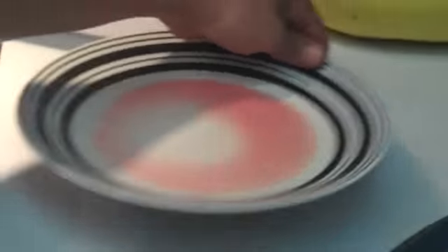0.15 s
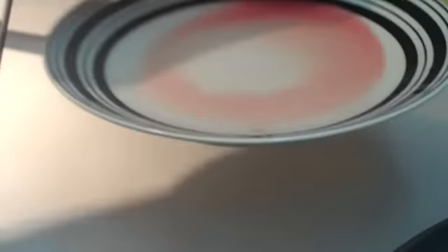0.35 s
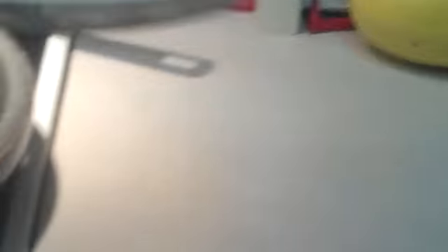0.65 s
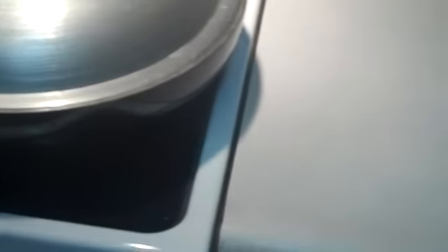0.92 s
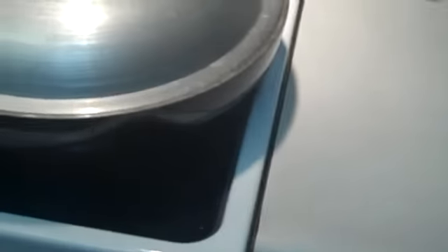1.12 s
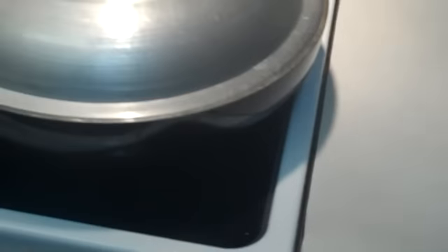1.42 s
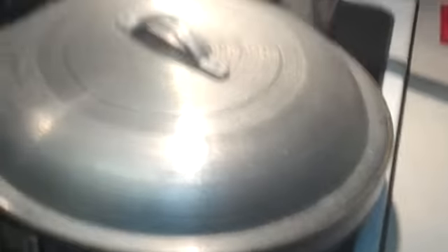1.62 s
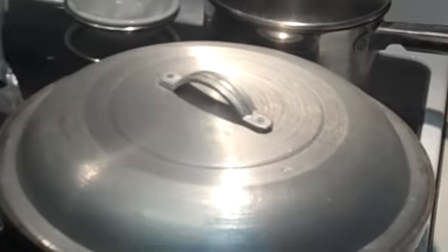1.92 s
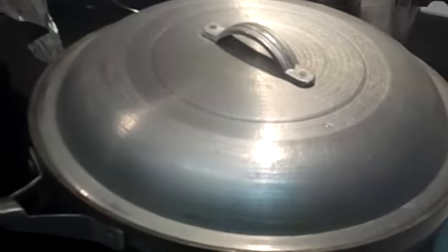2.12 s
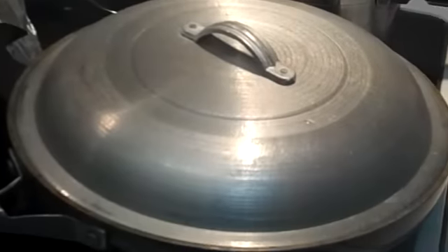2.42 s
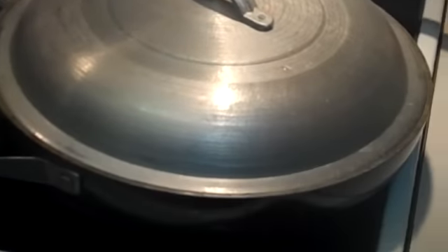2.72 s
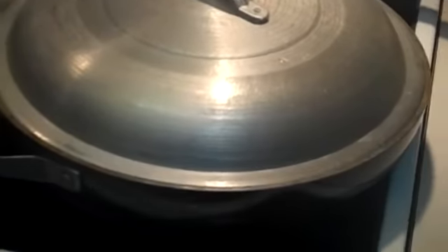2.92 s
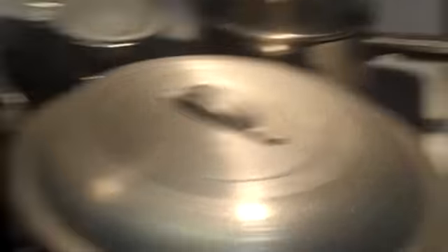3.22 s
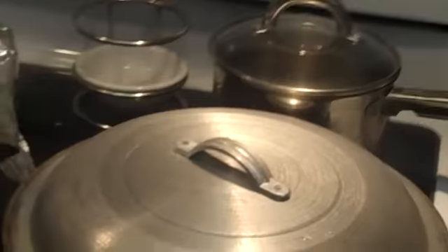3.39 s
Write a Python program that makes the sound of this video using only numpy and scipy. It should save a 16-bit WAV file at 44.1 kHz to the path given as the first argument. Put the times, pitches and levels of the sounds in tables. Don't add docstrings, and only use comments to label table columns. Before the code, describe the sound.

Continuous frying fizz and crackle from a covered pan on a kitchen stove, a few soft knocks, and a short metal clatter before the sizzling continues alone; low room hum, slight handling rumble, muffled phone microphone.

```python
import sys
import numpy as np
from scipy import signal
from scipy.fft import rfft, irfft
from scipy.io import wavfile
from scipy.ndimage import uniform_filter1d

SR = 44100
rng = np.random.default_rng(int(sys.argv[2]) if len(sys.argv) > 2 else 0)


def transcribe(signal):
    frames = np.atleast_2d(signal).T
    limited = np.clip(frames, -1, 1)
    pcm = np.round(limited * 32767).astype(np.int16)
    wavfile.write(sys.argv[1], SR, pcm)


def decibels_to_gain(level_db):
    exponent = np.asarray(level_db, float) / 20
    return 10 ** exponent


N = 156555
WIDE_TOP_HZ = 6400


def colour(x, table):
    hz, db = np.array(table, float).T
    f = np.maximum(np.fft.rfftfreq(len(x), 1 / SR), 1)
    gain_db = np.interp(np.log(f), np.log(hz), db)
    y = irfft(rfft(x) * decibels_to_gain(gain_db), len(x))
    return y / y.std()


def ring(x, hz, width_hz):
    return signal.lfilter(*signal.iirpeak(hz, hz / width_hz, SR), x)


def walk(rate_hz):
    k = int(SR / rate_hz)
    steps = np.repeat(rng.standard_normal(N // k + 1), k)
    return 1.3 * uniform_filter1d(uniform_filter1d(steps, k), k)[:N]


def add(out, start_s, sound):
    i = max(int(start_s * SR), 0)
    out[i:i + len(sound)] += sound[:N - i]


def fizz():
    # time_s, level_db
    vigour = [(0, -38), (.1, -40.5), (.3, -39), (.52, -41), (.6, -38.5), (.8, -39), (.9, -41.5),
              (1.1, -38.5), (1.3, -38.5), (1.5, -38.5), (1.6, -39.5), (1.72, -35.5), (1.85, -39),
              (2.3, -39.5), (2.55, -38.5), (2.85, -40), (3.2, -39.5), (3.55, -37)]
    # hz, density_db
    spectrum = [(300, -47.5), (600, -12.5), (900, -7), (1390, -11), (2040, -7), (3600, -5.5), (5200, -1.5),
                (6400, -6.5), (8300, -42)]
    # mode_hz, width_hz, level_db
    lid_modes = [(956, 340, -6.5), (1209, 130, -14), (2120, 130, -5), (2350, 92, -10.5), (3480, 92, -18),
                 (4404, 50, -2.5), (5216, 230, 5), (5950, 180, 0)]
    bubbles_per_s, bubble_spread_db = 7000, 1.2
    lid_db, surge_db, flicker_db = -9, 1.4, 2.4

    t = np.arange(N) / SR
    u = rng.random((2, N))
    sizes = decibels_to_gain(-bubble_spread_db * np.log(u[1] + 0.005))
    clicks = (u[0] < bubbles_per_s / SR) * sizes * rng.standard_normal(N)
    broad = colour(clicks + 0.18 * rng.standard_normal(N), spectrum)
    lid = sum(decibels_to_gain(db) * ring(clicks, hz, width_hz) for hz, width_hz, db in lid_modes)
    mix = broad + decibels_to_gain(lid_db) * lid / lid.std()

    surge = walk(14)
    out = np.zeros(N)
    for hz in 350 * 2 ** np.arange(0, 4.4, .5):
        out += ring(mix, hz, 0.41 * hz) * decibels_to_gain(surge_db * surge + flicker_db * walk(24))
    return out / out.std() * decibels_to_gain(np.interp(t, *np.array(vigour).T))


def bursts(table, width, crack_db, crack_s, rise_s):
    out = np.zeros(N)
    t = np.arange(SR // 4) / SR
    noise = rng.standard_normal((len(table), 2, len(t)))
    for (start_s, peak_db, hz, t60_s), (puff, snap) in zip(table, noise):
        first_half_cycle = t < 1 / hz / 2
        body = ring(puff + 3 * first_half_cycle, hz, width * hz)
        crack = ring(snap + 1.5 * first_half_cycle, 1.25 * hz, .8 * hz)
        crack = ring(crack, 1.25 * hz, .8 * hz)
        crack = decibels_to_gain(crack_db) * crack / crack.std() * np.exp(-t / crack_s)
        envelope = (1 - np.exp(-t / rise_s)) * 1000 ** (-t / t60_s)
        sound = (body / body.std() + crack) * envelope
        add(out, start_s, decibels_to_gain(peak_db) * sound / np.abs(sound).max())
    return out


def pops():
    # start_s, peak_db, cavity_hz, t60_s
    strong = [(0.0159, -34, 3130, 0.053), (0.0318, -29.5, 2985, 0.14), (0.0862, -22, 2130, 0.097),
              (0.1516, -32, 3390, 0.073), (0.6519, -29.5, 1840, 0.061), (0.7886, -29.5, 1975, 0.08),
              (0.9827, -32, 2064, 0.089), (1.4576, -24, 2590, 0.062), (1.494, -25, 1964, 0.085),
              (1.6215, -21, 2550, 0.19), (1.6931, -27.5, 2870, 0.11), (1.7509, -30, 2070, 0.083),
              (1.9644, -24.5, 1873, 0.06), (2.1365, -20.5, 2060, 0.077), (2.1675, -28, 2970, 0.072),
              (2.388, -22.5, 2150, 0.045), (2.5067, -23.5, 2120, 0.057), (2.5805, -29, 2190, 0.052),
              (2.7531, -21.5, 2120, 0.16), (2.9535, -21.5, 2120, 0.085), (3.0669, -30, 2900, 0.13),
              (3.0874, -25, 2740, 0.089), (3.1283, -25, 3250, 0.093), (3.1557, -22.5, 1860, 0.2)]
    # start_s, peak_db, cavity_hz, t60_s
    weak = [(0.58, -30, 2350, 0.2), (1.4735, -28, 2500, 0.053), (1.6402, -24, 1890, 0.11),
            (3.483, -28, 2170, 0.13), (3.5333, -30, 2990, 0.091), (0.2125, -32, 3840, 0.042),
            (0.5408, -35, 2820, 0.12), (1.05, -32, 1810, 0.088), (1.2301, -31.5, 3310, 0.16),
            (1.3448, -34, 3175, 0.11), (1.4361, -32.5, 3200, 0.069), (1.496, -25.5, 2710, 0.055),
            (1.77, -29.5, 2880, 0.051), (2.389, -25, 2786, 0.051), (2.4344, -31, 3280, 0.079),
            (2.517, -27, 3730, .08), (2.6058, -32.5, 2920, 0.08), (2.7002, -34.5, 2090, .08),
            (2.76, -30, 4160, 0.067), (3.089, -32.5, 3940, 0.033), (3.547, -24, 2330, .1)]
    return bursts(strong + weak, .14, 2.2, 0.006, 0.0005)


def spits():
    # start_s, peak_db, cavity_hz, t60_s
    droplets = [(.0987, -25, 5040, 0.077), (0.165, -25.5, 4900, 0.05), (0.2428, -33, 5360, 0.14),
                (0.7582, -25.5, 5200, 0.036), (.8001, -33, 5440, 0.076), (.819, -32, 4500, .02),
                (1.0859, -29.5, 5400, 0.057), (1.3887, -34, 5300, 0.037), (1.5763, -33.5, 4600, 0.055),
                (1.6385, -30.5, 5300, 0.062), (1.7005, -26, 5200, 0.1), (1.8731, -31, 5730, 0.045),
                (2.0614, -33, 5170, 0.035), (2.141, -28, 5300, 0.074), (2.3252, -35, 5170, 0.05),
                (2.3835, -25.5, 5140, 0.062), (2.5377, -22.5, 4850, 0.056), (2.7506, -24.5, 4900, 0.1),
                (2.8535, -23, 5370, 0.025), (2.8953, -28.5, 5170, .04), (3.0031, -25, 5290, .04)]
    return bursts(droplets, 0.27, 2.0, 0.0044, 0.00054)


def knocks():
    # start_s, peak_db, body_hz, t60_s
    hits = [
        (0.037, -31, 678, 0.28),
        (0.064, -29.5, 721, 0.34),
        (0.554, -26.5, 900, 0.15),
        (0.821, -33, 802, 0.14),
        (1.317, -42, 827, 0.36),
        (1.696, -28.5, 802, 0.2),
        (1.759, -37.5, 880, 0.25),
        (3.067, -36.5, 886, 0.27),
    ]
    thumps = [(start_s, db - 7.5, 220, t60_s) for start_s, db, hz, t60_s in hits]
    return bursts(hits, .4, -1.7, 0.011, .002) + bursts(thumps, 0.45, -5, 0.025, 0.0034)


def clatter():
    # start_s, peak_db, contact_s, brightness_db
    blows = [(3.224, -28, 0.0018, 6.5), (3.239, -12, 0.0019, 0.5), (3.244, -8.5, 0.0023, 0.5),
             (3.2505, -17, 0.0028, 5), (3.272, -19, .002, -1.5), (3.284, -22.5, .002, -3),
             (3.296, -12, 0.0015, 2), (3.309, -14.5, 0.002, -2), (3.327, -17, 0.0027, -6),
             (3.346, -20.5, .003, 1), (3.368, -23, 0.0027, -3), (3.392, -24.5, .003, -2)]
    # mode_hz, level_db, t60_s
    low_modes = [(269.4, -2, 0.3), (398.6, 0, 0.14), (440, -6, 0.23), (462.5, -5.5, 0.27),
                 (502.6, -5.5, 0.2), (547, -10.5, 0.14), (688, -2.5, 0.45), (730, -10, 0.18),
                 (817, -14, 0.35), (940, -14, 0.3), (1120, -7.5, 0.41), (1479, -14.5, 0.3),
                 (1533, -12.5, 0.34), (1665, -13, 0.33)]
    # mode_hz, level_db, t60_s
    top_modes = [(1753, -12.5, .2), (2116, -17, .2), (2236, -14.5, 0.63), (2426, -7.5, 0.14),
                 (2687, -12, 0.33), (2914, -14.5, .2), (3023, -12, 0.41), (3447, -15, .3),
                 (4060, -14, 0.23), (4510, -16, 0.13), (4834, -11, .15), (5350, -19, .1),
                 (5870, -19, 0.068)]
    # centre_hz, width_hz, level_db
    rattle_bands = [(514, 150, -4), (1150, 350, -2), (1628, 320, -1), (2208, 240, -3.5), (2850, 500, 0),
                    (3545, 370, -5), (4550, 400, -3), (5300, 900, -2)]
    rattle_db, rattle_t60_s, thud_db = .5, 0.15, -4
    wobble_rad, damped_at_s, damping_s = .45, 3.425, 0.0047

    out = np.zeros(N)
    t = np.arange(SR // 2) / SR
    pan = low_modes + top_modes
    chance = rng.standard_normal((len(blows), len(pan), 3))
    wobble = walk(90)
    for (start_s, peak_db, contact_s, bright_db), rows in zip(blows, chance):
        modes = np.zeros(len(t))
        for (hz, db, t60_s), (level, detune, turn) in zip(pan, rows):
            gain = decibels_to_gain(db + 2.1 * level + bright_db * np.log2(hz / 700) / 2)
            rocking = wobble_rad * np.roll(wobble, int(40 * hz))[:len(t)]
            phase = 2 * np.pi * hz * (1 + 0.0017 * detune) * t + 2 * turn + rocking
            modes += gain * np.sin(phase) * 1000 ** (-t / t60_s) / 4
        noise = rng.standard_normal(len(t))
        rattle = np.zeros(len(t))
        for hz, width_hz, db in rattle_bands:
            gain = decibels_to_gain(db + bright_db * np.log2(hz / 700) / 2)
            rattle += gain * ring(ring(noise, hz, width_hz), hz, width_hz) * np.sqrt(300 / width_hz)
        thud = ring(noise, 330, 250)
        loose = decibels_to_gain(rattle_db) * rattle * 5 + decibels_to_gain(thud_db) * thud / thud.std()
        loose *= 1000 ** (-t / rattle_t60_s) / 3
        add(out, start_s, decibels_to_gain(peak_db) * (modes + loose) * (1 - np.exp(-t / contact_s)))
    late = (np.arange(N) / SR - damped_at_s) / damping_s
    return out / (1 + np.exp(np.clip(late, -50, 50)))


def handling():
    # start_s, length_s, level_db
    shifts = [
        (0.165, 0.33, -61),
        (0.614, 0.1, -63),
        (0.744, 0.035, -62.5),
        (0.916, 0.056, -64),
        (1.011, 0.022, -54),
        (1.07, 0.14, -62),
        (1.326, 0.049, -64),
        (2.814, 0.045, -67),
        (3.247, 0.16, -60),
    ]
    out = np.zeros(N)
    spectrum = [(10, -9.5), (30, -1.5), (50, 5), (70, 0.5), (110, -41), (20000, -101.0)]  # hz, density_db
    rumble = colour(rng.standard_normal(N), spectrum)
    rumble /= np.sqrt(uniform_filter1d(rumble ** 2, SR // 25))
    for start_s, length_s, db in shifts:
        patch = signal.windows.tukey(int(length_s * SR), min(0.025 / length_s, 1))
        add(out, start_s, decibels_to_gain(db) * patch)
    return out * rumble


def kitchen():
    # hz, density_db
    spectrum = [(30, -21.5), (90, -28.5), (150, -10), (210, -2), (320, -18), (425, -5), (530, -19.5),
                (700, -11), (1000, -40)]
    level_db, early_db, early_s = -57.5, 4.5, 0.49
    t = np.arange(N) / SR
    drift_db = early_db * np.exp(-t / early_s) + 3.6 * walk(15)
    return colour(rng.standard_normal(N), spectrum) * decibels_to_gain(level_db + drift_db)


def scene():
    oil = fizz() + pops() + spits()
    low_cut = signal.butter(4, 170, "high", fs=SR, output="sos")
    events = signal.sosfilt(low_cut, knocks() + clatter())
    return (oil + events + kitchen())[None]


def thin_spectrum(x):
    frame, frame_start = 941, 497
    top_hz, wide_share = 6000, .25
    step_db, step_scatter_db = 6, 3.5
    spread, dropout_sigma = .8, .95

    n = np.arange(2 * frame)
    k = np.arange(int(2 * WIDE_TOP_HZ * frame / SR))
    window = np.sin(np.pi * (n + .5) / (2 * frame))
    basis = window[:, None] * np.cos(np.pi / frame * np.outer(n + .5 + frame / 2, k + .5))
    lead = 2 * frame - frame_start
    x = np.pad(x, (lead, 3 * frame))
    c = np.lib.stride_tricks.sliding_window_view(x, 2 * frame)[::frame] @ basis

    widths = np.clip(1.09 ** np.arange(60), 4, 12)
    edges = np.unique((np.cumsum(widths) // 4 * 4).astype(int))
    band = np.searchsorted(edges, k, side="right")
    power = np.array([np.mean(c[:, band == b] ** 2, axis=1) for b in range(band.max() + 1)]).T
    mask = power ** (1 - spread) * uniform_filter1d(power, size=5, axis=1) ** spread

    def scatter():
        return np.sqrt(2) * uniform_filter1d(rng.standard_normal(power.shape), size=2, axis=0)

    step = np.sqrt(mask) * decibels_to_gain(step_db + step_scatter_db * scatter())
    step = step[:, band] + 1e-9
    q = np.sign(c) * np.floor(np.abs(c / step) ** .75 + .4054) ** (4 / 3) * step

    weakness = np.log(mask / power)
    boost = np.log(power / np.median(power, axis=0)).clip(0)
    starved = scatter() + weakness - .6 * boost > dropout_sigma
    q *= ~starved[:, band]
    q *= (k < 2 * top_hz * frame / SR) | (rng.random((len(c), 1)) < wide_share)

    frames = q @ basis.T * 2 / frame
    y = np.zeros(len(x))
    for i, piece in enumerate(frames):
        y[i * frame:(i + 2) * frame] += piece
    return y[lead:lead + N]


def residue(x):
    # hz, density_db
    spectrum = [(100, -7.5), (6000, 4), (8000, -2.5), (8600, -17.5), (9000, -42)]
    level_db, flicker_db = -31, 1.7
    treble = ring(x, 3900, 4000)
    follow = np.sqrt(uniform_filter1d(treble ** 2 + 0.12 * x ** 2, SR // 90) + 1e-10) ** 0.66
    hiss = colour(rng.standard_normal(N), spectrum)
    dips_db = 7.6 * np.clip(walk(30) - 1.1, 0, 1)
    return hiss * follow * decibels_to_gain(level_db + flicker_db * walk(60) - dips_db)


def squeak():
    start_s, length_s, level_db, ramp_s = 0.174, 0.027, -50, 0.0031
    from_middle_s = abs(np.arange(N) / SR - start_s - length_s / 2)
    gate = np.clip((length_s / 2 - from_middle_s) / ramp_s, 0, 1)
    band = signal.butter(6, (6400, 7400), "band", fs=SR, output="sos")
    return signal.sosfilt(band, gate * decibels_to_gain(level_db) * 4 * rng.standard_normal(N))


def band_limit(x):
    return signal.sosfilt(signal.butter(12, 8820, fs=SR, output="sos"), x)


def record(dry):
    shaping, ceiling = .8, .55
    quick = uniform_filter1d(uniform_filter1d(dry[0] ** 2, size=200), size=200)
    quick = quick ** (shaping / 2) + 1e-9
    x = thin_spectrum(dry[0] / quick) * quick
    x = ceiling * np.tanh(x / ceiling)
    x = signal.sosfilt(signal.butter(10, 0.96 * WIDE_TOP_HZ, fs=SR, output="sos"), x)
    mix = x + residue(x) + handling() + squeak()
    return band_limit(mix[None])


dry = scene()
out = record(dry)
transcribe(out)
```